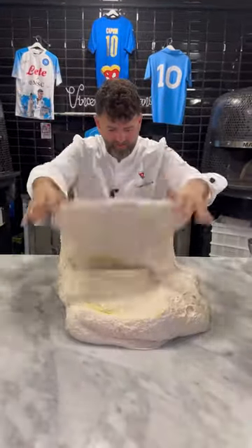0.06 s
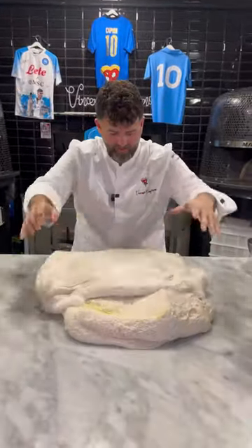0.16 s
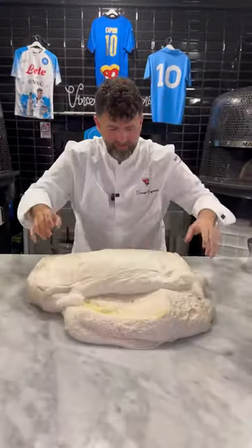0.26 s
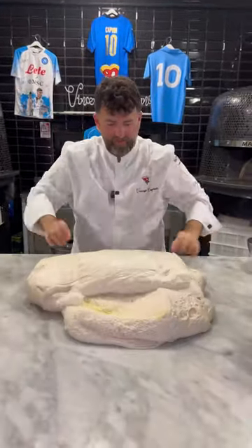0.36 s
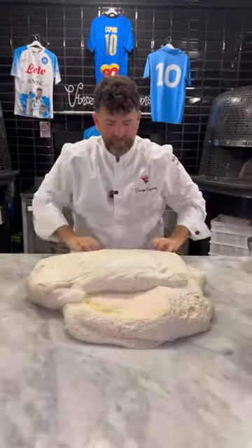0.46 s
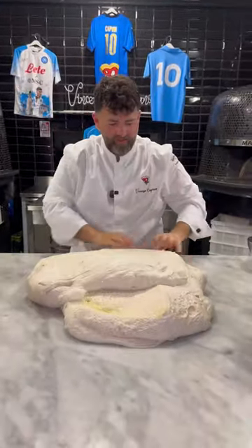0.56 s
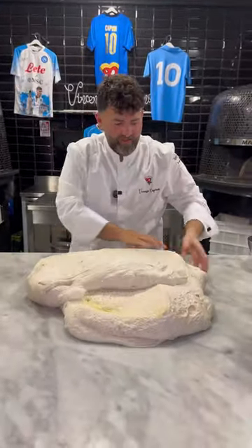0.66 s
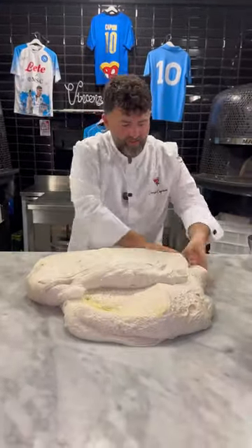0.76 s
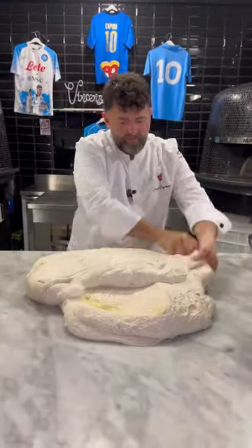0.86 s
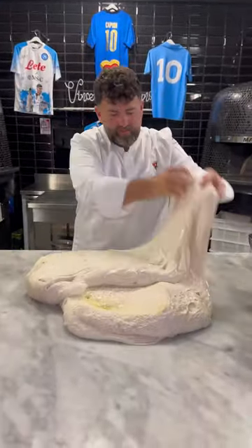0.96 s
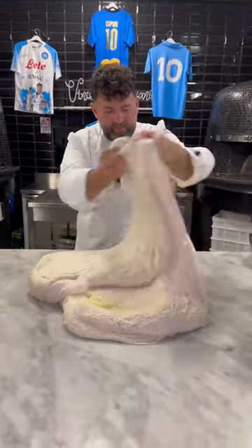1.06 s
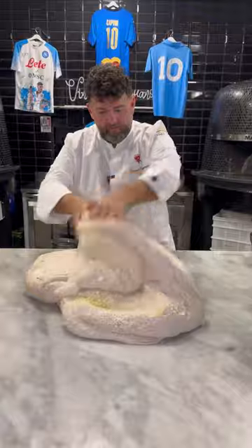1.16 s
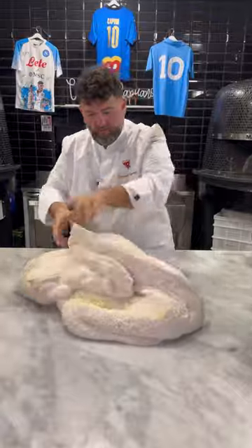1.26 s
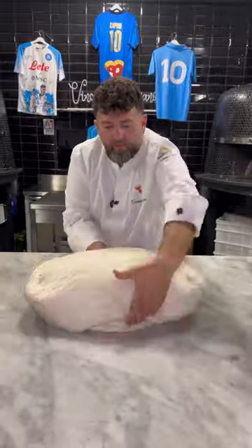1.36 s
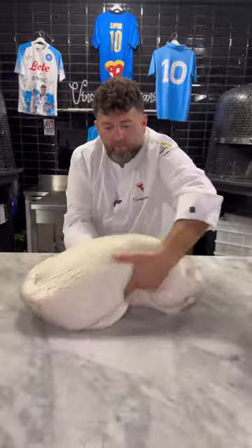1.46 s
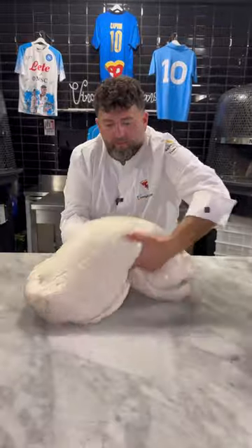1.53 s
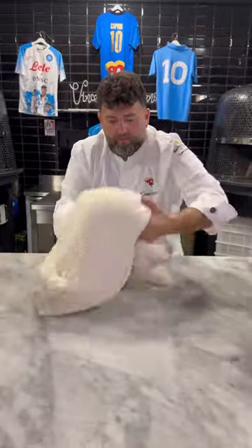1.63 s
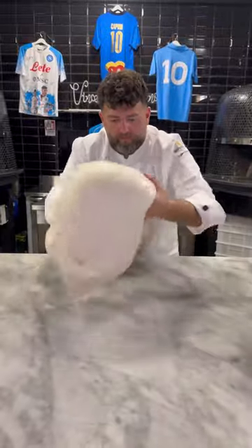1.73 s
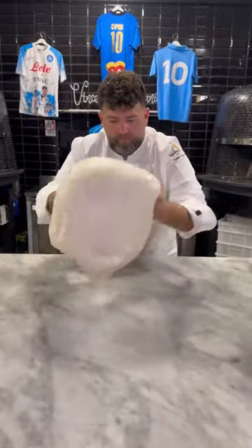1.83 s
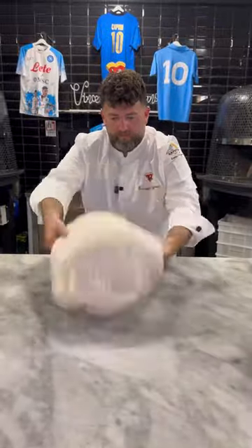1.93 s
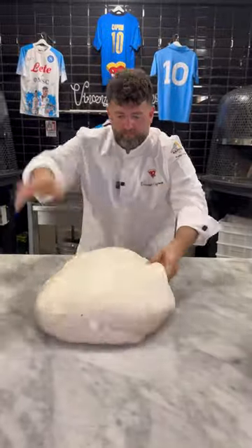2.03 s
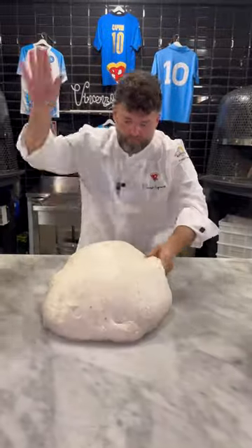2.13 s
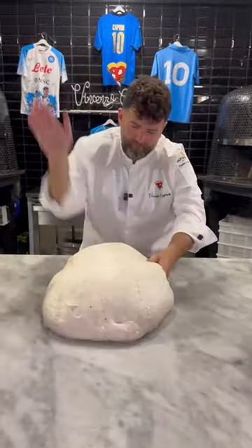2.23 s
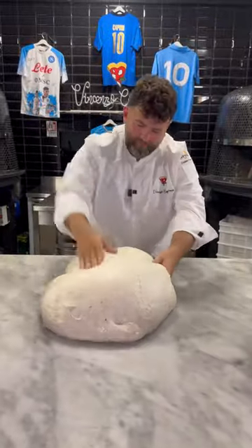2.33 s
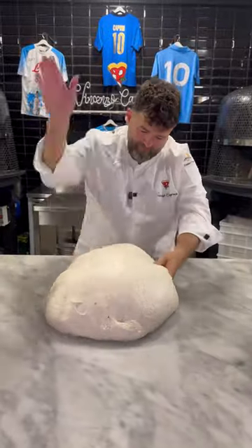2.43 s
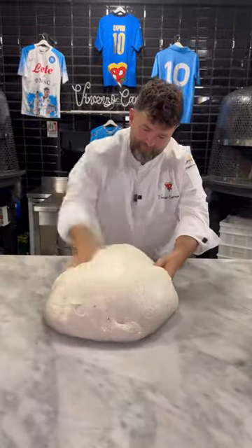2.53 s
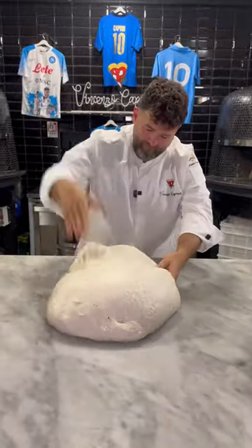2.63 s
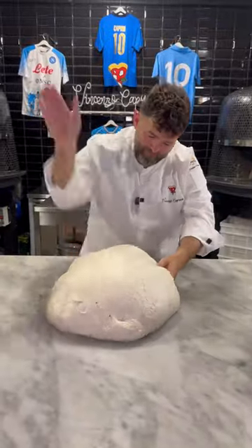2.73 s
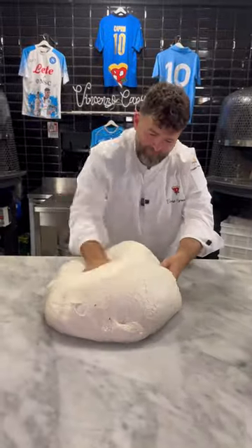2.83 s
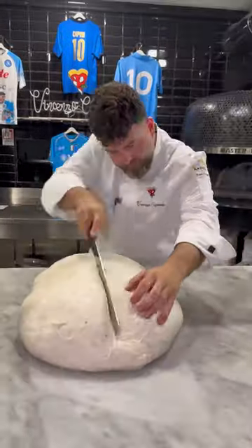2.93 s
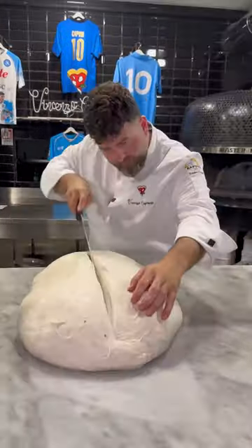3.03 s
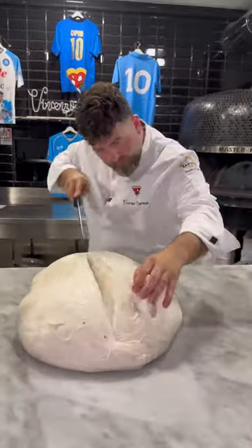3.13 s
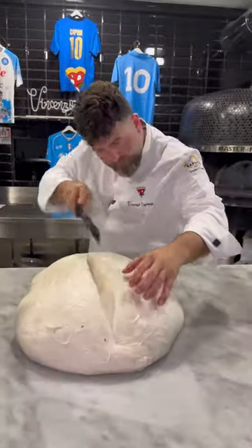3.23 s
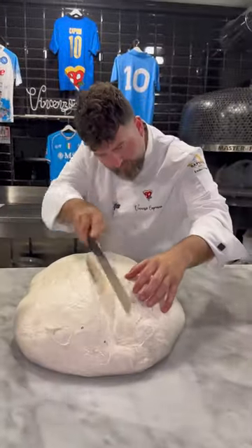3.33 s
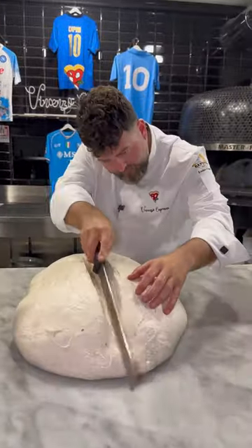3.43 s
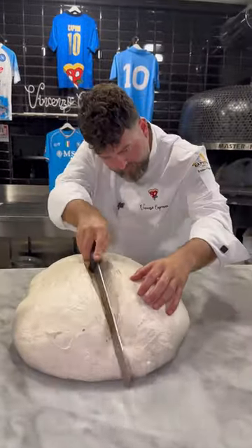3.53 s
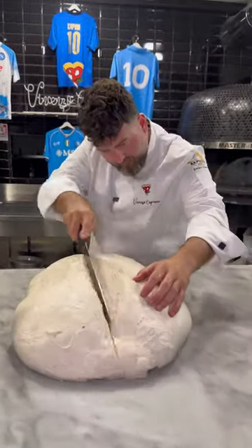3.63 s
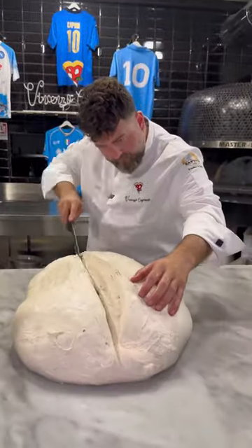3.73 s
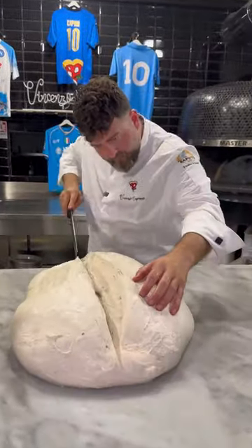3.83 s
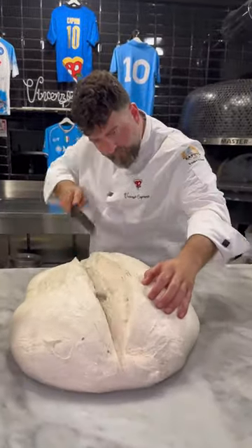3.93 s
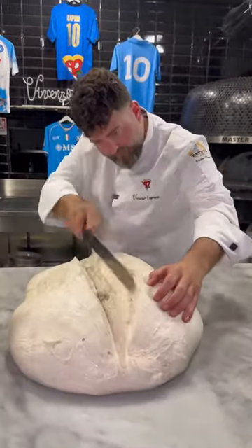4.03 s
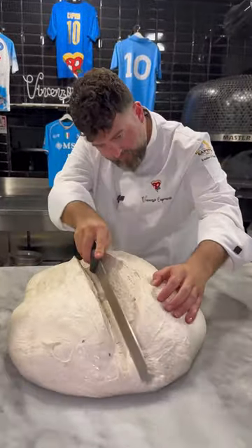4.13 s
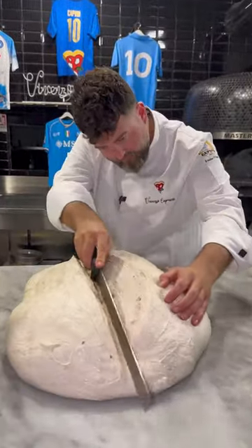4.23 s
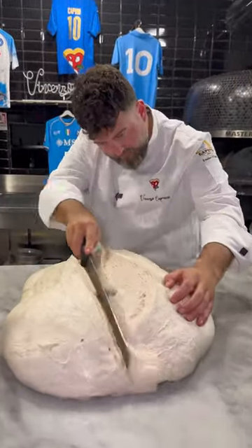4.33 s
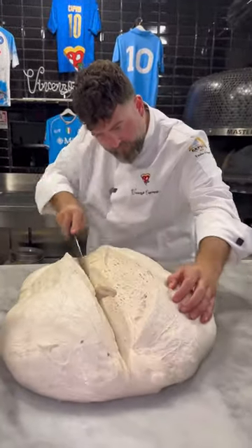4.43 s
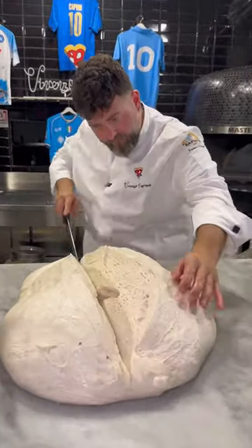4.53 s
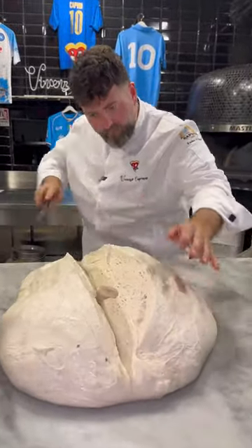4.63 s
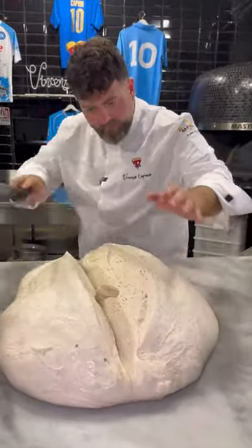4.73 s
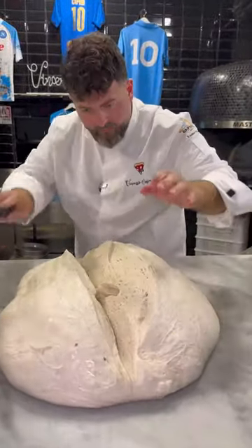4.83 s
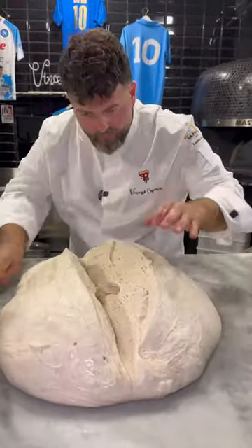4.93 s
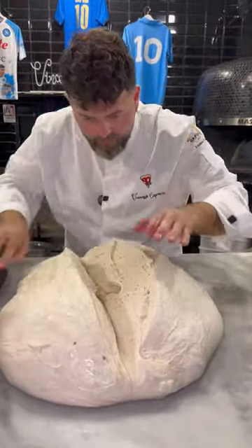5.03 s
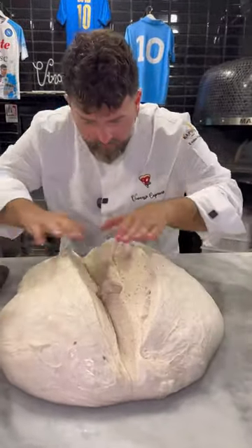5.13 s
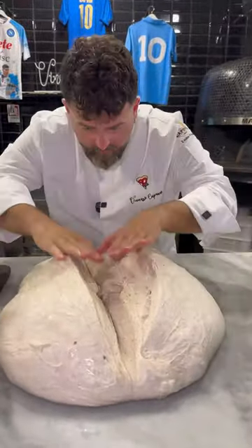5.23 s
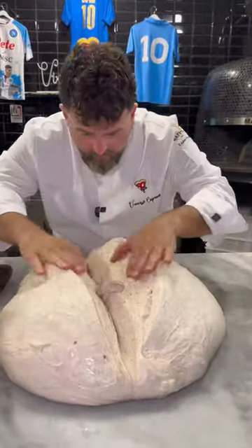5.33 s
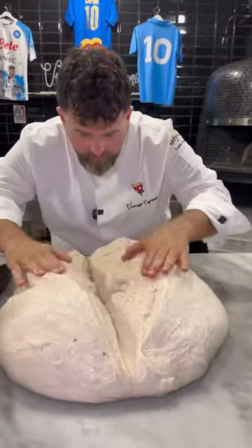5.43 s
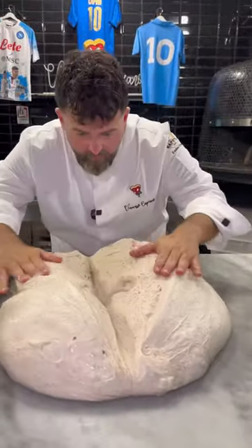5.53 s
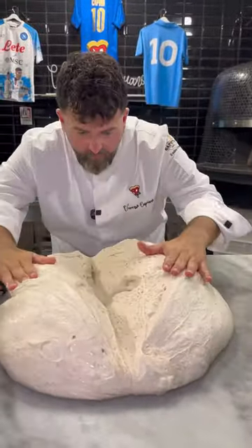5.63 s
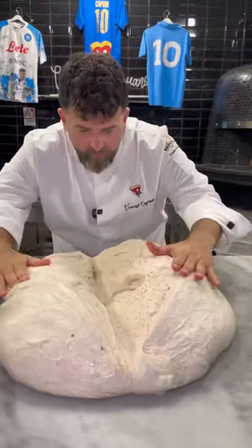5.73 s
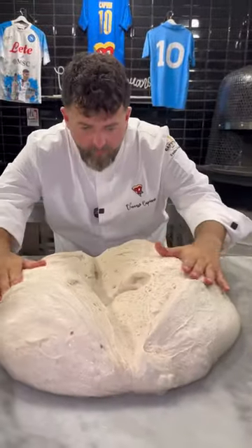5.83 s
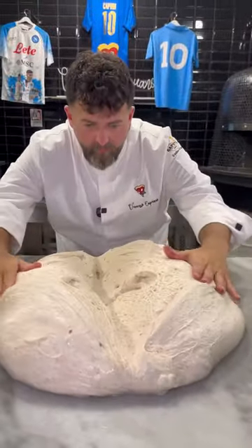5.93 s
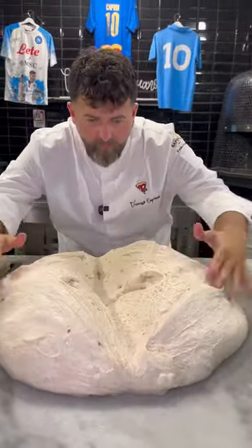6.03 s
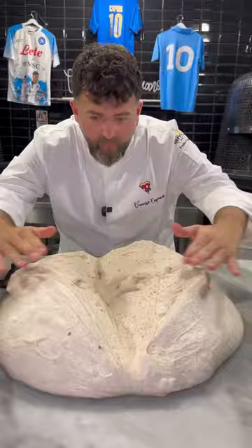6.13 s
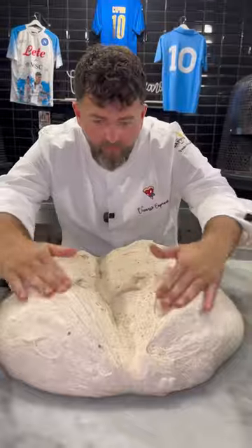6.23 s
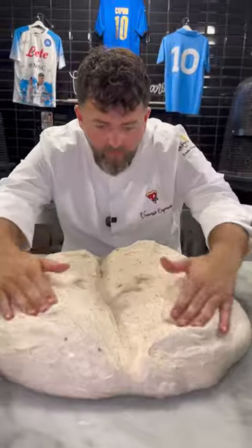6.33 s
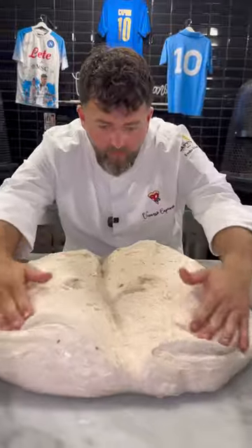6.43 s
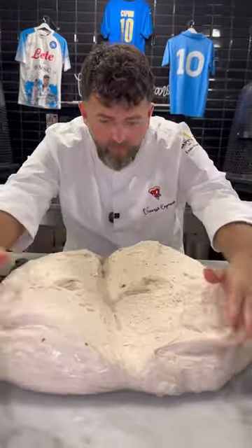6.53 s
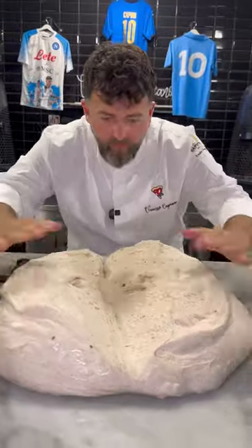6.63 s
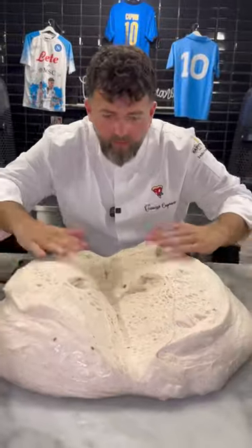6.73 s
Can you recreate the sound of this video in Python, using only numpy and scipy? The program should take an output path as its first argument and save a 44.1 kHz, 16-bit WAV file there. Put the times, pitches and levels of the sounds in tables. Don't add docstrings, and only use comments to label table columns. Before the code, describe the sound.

Heavy wet dough is folded, dropped and slapped three times very loudly on stone, then a thrown-down knife clatters and rings to rest.

```python
import sys
import numpy as np
from scipy import signal
from scipy.fft import rfft, irfft, next_fast_len
from scipy.io import wavfile
from scipy.ndimage import map_coordinates

SR = 44100
rng = np.random.default_rng(int(sys.argv[2]) if len(sys.argv) > 2 else 0)


def invert_db(x):
    u = np.asarray(x, float) / 20
    return 10 ** u


def generate_wav(sig):
    pcm = np.round(np.clip(np.atleast_2d(sig).T, -1, 1) * 32767).astype(np.int16)
    wavfile.write(sys.argv[1], SR, pcm)


N = 298597
TAIL = SR * 3 // 5

# frequency in Hz, level in dB per Hz.
COOLERS = [(15, -39), (25, -11), (70, -6.5), (138, 3.5), (197, -4), (259, 1.5), (445, -7.5), (524, -9.5),
           (726, -11.5), (878, -11.5), (979, -12), (1360, -21.5), (4500, -31.5), (10100, -38), (15800, -51),
           (16500, -58)]
# time in seconds, level in dB.
COOLERS_DB = [(0, -50.5), (1.9, -46.5), (3, -47), (4.2, -47), (5.6, -48), (6.77, -49)]
# frequency in Hz, width in Hz, level in dB.
HUMS = [(126, 14, -56.5), (262, 19, -55), (1460, 37, -70)]
# time in seconds, level in dB.
FAN = [(0, -58), (1.9, -55), (3, -60), (4.7, -57.5), (5.6, -63), (6.2, -55.5), (6.77, -62)]
FAN_HZ = 878

# frequency in Hz, level in dB per Hz.
COTTON = [(290, -30.5), (500, -1), (1060, -1.5), (1230, -2), (1620, -5.5), (4000, -20.5), (5200, -45.5),
          (8800, -120)]
# frequency in Hz, level in dB per Hz.
FIBRES = [(1470, -24.5), (2500, -5), (3480, -4), (11300, -14), (14900, -17), (16100, -14.5), (16500, -51)]
# frequency in Hz, level in dB per Hz.
WEIGHT = [(24, -30), (40, -5), (221, 4), (306, 1.5), (608, -4.5), (659, -6), (1000, -15.5), (1300, -33.5),
          (2200, -120)]
# peak time in seconds, level in dB, rise in seconds,
# fall in seconds, weight over the rub in dB.
FOLDING = [(.062, -50, 0.16, 0.21, 10.5), (.175, -44, 0.23, 0.11, 8.5), (.41, -54, 0.23, 0.21, 4),
           (.66, -52.5, 0.11, 0.36, 6), (.772, -48, 0.02, 0.21, 12.5), (.885, -45, 0.28, 0.12, 5),
           (.96, -57, .1, .1, 0), (1.015, -47.5, 0.073, .1, 3), (1.042, -47.5, 0.068, 0.02, 6),
           (1.17, -54, 0.24, 0.048, 6), (1.225, -44, 0.099, 0.14, 6.5), (1.27, -51.5, 0.084, .06, 9),
           (1.351, -44.5, 0.0056, 0.27, 8), (1.482, -42.5, 0.07, 0.031, 6.5), (1.43, -47, 0.099, .2, 0),
           (1.54, -49.5, 0.14, 0.36, -7), (1.945, -53.5, 0.16, 0.054, 8)]
CUTTING = [(2.96, -46, 0.022, 0.11, -1.5), (3.072, -50, 0.0095, 0.065, 17), (3.0, -51.5, 0.06, 0.057, 2.5),
           (3.14, -57.5, 0.095, 0.22, 2), (3.392, -40, 0.11, 0.05, -4), (3.45, -49, .1, 0.2, -10),
           (3.6, -50, 0.13, 0.29, 2), (3.87, -56, 0.64, 0.017, 12), (4.09, -47, 0.093, 0.2, 4.5),
           (4.14, -46, 0.21, 0.14, -3), (4.19, -55, 0.7, 0.0083, -7), (4.275, -54.5, 0.047, 1, 0),
           (4.31, -58, 0.081, 0.071, 6), (4.45, -54, 0.073, 0.27, 0.5), (4.66, -61, 0.054, 0.8, -4),
           (4.8, -58, 0.022, 0.16, 10.5), (4.95, -56.5, 0.042, 0.0098, 13)]
OPENING = [
    (5.51, -60.5, 0.046, 0.066, 15),
    (5.92, -60, 0.31, 0.077, 7.9),
    (6.04, -51, 0.071, 0.14, 7),
    (6.24, -47, 0.12, 0.25, 7.7),
    (6.32, -57, 0.15, 0.25, 6.5),
    (6.49, -49.5, 0.22, 0.13, 10.6),
    (6.54, -51, 0.35, 0.024, 11.3),
    (6.62, -45, 0.07, 0.11, 9.8),
    (6.68, -59, .05, 0.22, 14.5),
    (6.765, -57, 0.039, .1, 3.6),
]
BRIGHT_DB = (-3.5, -5, -4.5)
STROKE_DB = 20
DULLS_PER_DB, LIGHT_DB = 0.5, -47.5

# time in seconds, peak in dB, pitch in Hz, life in cycles.
THUDS = [(0.0609, -19, 209, 0.95), (0.1143, -23, 444, 1), (0.17, -21.5, 374, 0.46), (.754, -30, 244, 0.79),
         (0.7906, -31, 547, 0.69), (1.2054, -12, 480, 0.54), (1.231, -31, 339, .48),
         (1.346, -31, 206, 0.54), (1.3614, -26, 500, .6), (0.871, -29, 330, .5), (2.277, -29.5, 150, 0.96),
         (1.9979, -22.5, 300, .4), (1.5583, -26.5, 570, 0.55), (1.577, -29.5, 198, 0.99),
         (1.9774, -26, 214, .92), (2.008, -10.5, 134, 0.98), (2.0608, -17.5, 230, 0.44),
         (2.134, -28.5, 153, 0.65), (2.5523, -16, 420, 0.35), (2.551, -22, 900, .4),
         (3.0712, -24.5, 329, 0.46), (3.078, -25, 157, 0.55), (3.088, -28.5, 220, 0.49),
         (3.231, -26, 277, 0.4), (3.3358, -29, 199, 0.45), (3.777, -29.5, 183, 0.36), (3.784, -31, 450, .8),
         (3.819, -33, 277, 0.59), (4.055, -17.5, 248, 0.3), (4.063, -23, 260, 0.36),
         (4.554, -23.5, 129, 0.55), (4.575, -27.5, 267, 1), (4.684, -32.5, 163, 0.49),
         (5.7796, -38, 219, .99), (6.478, -21, 400, 0.4), (6.621, -40, 262, 0.7)]
THUD_TICK_DB, THUD_TICK_PER_OCTAVE_DB = -23, -2.5
# time in seconds, pull in dB, pitch in Hz, tick over the pull in dB.
TACKS = [(.146, -44, 920, -4), (0.8035, -24.5, 225, -10), (0.8497, -29, 400, -16), (1.0192, -32, 570, -1),
         (1.2733, -25, 220, -14), (1.359, -29, 360, -6), (1.476, -40, 700, -2), (1.647, -33, 430, 1),
         (1.6957, -41, 550, 6), (2.6, -34.5, 277, 7.5), (1.856, -50, 900, 10), (1.966, -28, 700, 8.5),
         (1.999, -14, 470, 6), (3, -36, 900, -7), (3.39, -33, 1100, -5), (3.979, -35, 280, -9),
         (4.13, -26.5, 930, 0), (6.0454, -33, 330, -11), (3.0735, -23, 650, -21),
         (1.2045, -16.5, 1120, -18), (6.4795, -23, 400, -22), (5, -45, 980, 7), (5.705, -43, 900, 1.5),
         (5.741, -48, 900, 7), (4.28, -41, 1000, 0), (4.822, -47.5, 840, 9), (.771, -25, 650, -13),
         (.1665, -23, 280, -20), (.884, -29.5, 250, -15), (0.067, -29, 830, -14), (.778, -29, 350, -15)]
TACK_CYCLES = 0.7
SNAP_S = 4.1956
# frequency in Hz, level in dB per Hz.
TICK = [(1000, -3.5), (4000, -2.5), (9000, -3.5), (12000, -8.5), (16000, -25.5)]

# start in seconds, length in seconds, level in dB.
RIPS = [(0.143, 0.006, -38.5), (0.113, .005, -45), (.666, .01, -54), (0.797, 0.0055, -44),
        (0.847, 0.0055, -43), (1.009, .012, -54), (1.199, 0.0072, -43.5), (1.357, 0.017, -44.5),
        (1.467, 0.014, -42), (1.975, 0.005, -43), (2.011, .006, -40), (1.974, .003, -48), (3.089, .02, -53),
        (3.281, 0.0043, -53), (3.346, .016, -46), (3.382, 0.018, -45), (3.496, 0.0045, -52),
        (4.13, 0.0069, -40.5), (4.228, 0.0027, -55), (4.442, 0.011, -63), (6.226, 0.0025, -41),
        (6.031, 0.017, -55), (6.003, 0.0039, -59), (2.252, 0.074, -56), (2.305, .003, -48),
        (2.793, 0.035, -46)]
# frequency in Hz, level in dB per Hz.
RASP = [(700, -38), (1500, 7), (3000, -1), (8000, -9), (15500, -21), (16500, -42)]

DROP_S = 1.9987
# frequency in Hz, level in dB per Hz.
SMACK = [(300, -10), (800, -2), (2000, -4), (3300, -1.5), (4200, -18), (5300, -4), (7000, -12),
         (10800, -32), (15000, -26.5), (16500, -43.5)]
# frequency in Hz, level in dB per Hz.
SETTLE = [(29, -36), (50, -9), (209, -8), (776, -18.5), (1490, -13), (1770, -21), (3250, -12.5),
          (3940, -17.5), (7500, -24), (9000, -33), (15800, -41), (16500, -59.5)]
# frequency in Hz, time to fall 60 dB in seconds.
TILES = [(60, 1), (160, 0.5), (420, 0.39), (1100, 0.46), (2910, 0.35), (7680, 0.35)]

SLAP_S = [2.3102, 2.5756, 2.8237]
CUT_S = 2.9385
# drum in dB, crack in dB, room in dB, drum pitch factor,
# hollow of the palm in Hz, squelch in Hz.
SLAPS = [
    (5.5, 8.5, -10.5, 1.01, 5800, 2100),
    (3, 9, -11.5, .99, 2500, 2100),
    (6.5, 9, -7.5, 1.02, 4010, 1600),
]
# cloth in dB, weight in dB, rise in seconds.
SWING = [
    (-36, -32, .012),
    (-59, -40, .02),
    (-47.5, -27.5, .015),
]
# frequency in Hz, level in dB, time to fall 60 dB in seconds.
DRUM = [(78.8, -10, 0.13), (141.4, 4, 0.061), (154.2, -13.5, 0.33), (177.2, -10.5, 0.1), (262, -13, 0.17),
        (414.2, -11, 0.13), (448.8, -14.5, 0.13), (640, -20.5, 0.089), (1079, -19.5, 0.13)]
# frequency in Hz, level in dB,
# time to fall 60 dB in seconds.
OWN = [
    [(430, -20, .3), (910, -14, .15), (697, -16, .12), (345, -20, .17)],
    [(221, -24, 1), (1380, -17.5, 0.27), (1545, -15, .15), (915, -20.5, 0.2)],
    [(665, -13, 0.12), (1214, -14, .19), (1734, -12.5, .14), (258, -10, .2)],
]
# frequency in Hz, level in dB.
CRACK = [(300, 2), (1500, 4.5), (3000, -9), (6000, -12), (10000, -5), (16000, -27)]
# frequency in Hz, level in dB per Hz.
FLAP = [(250, -30), (600, -8), (1000, 0.5), (1800, -3), (3500, -14.5), (9000, -30)]
FLAP_DB = (-7, -8.5, -5.5)
FLAP_T60_S = (.07, 0.053, 0.079)
# frequency in Hz, level in dB per Hz.
WASH = [(29, -46), (50, -15.5), (156, 1.5), (316, -4.5), (455, -4.5), (539, -13.5), (795, -14.5),
        (897, -13), (1950, -18), (2550, -18.5), (9910, -26.5), (15800, -40), (16500, -60)]

# time in seconds, level in dB, pitch in Hz.
SPITS = [
    (2.3158, -10, 10000),
    (2.347, -19, 9000),
    (2.5835, -12.5, 5000),
    (2.551, -33, 3200),
    (2.558, -35.5, 9000),
]
# start in seconds, level in dB, first pitch in Hz,
# rise in Hz per second, time to fall 60 dB in seconds.
POCKETS = [
    (2.32, -21.5, 1340, 1700, .2),
    (2.593, -12, 1500, 39000, 0.055),
    (2.838, -16, 1580, 5000, 0.22),
    (2.83, -26, 1100, 7100, .12),
]

# time in seconds, peak in dB, handle knock in dB,
# scrape length in seconds, tip brightness in dB.
FALL = [
    (4.96, -6, -5.5, 0.0044, 7),
    (4.9656, 0.5, -4, 0.0043, 0),
    (4.9676, -0.5, -3, .002, 0.5),
    (4.969, 2, -1, 0.0045, 4.5),
    (4.98, -14, 5.5, 0.0064, 2.5),
]
# heel time in seconds, heel in dB, tip delay in seconds, tip in dB.
ROCKS = [
    (5.0435, -10.5, 0.0094, -7),
    (5.1281, -12, 0.0062, -18),
    (5.198, -10, 0.0064, -12),
    (5.211, -19, 0.032, -26),
    (5.2854, -19, .0105, -27),
    (5.303, -23, 0.019, -28),
    (5.351, -32.5, 0.024, -31),
]
ROCK_S, HEEL_KNOCK_DB, TIP_KNOCK_DB = 0.0027, -26, -18
SHARP_DB, DULLS_DB_PER_S = 7.5, 29.5
# time in seconds, level in dB.
TAPS = [
    (5.082, -22),
    (5.099, -33),
    (5.156, -28),
    (5.177, -25),
    (5.056, -24),
    (5.012, -22),
]
TAP_BLADE_DB = -21
# frequency in Hz, width in Hz, level in dB.
BLADE = [(6900, 350, -0.5), (7650, 160, 2.5), (8290, 430, -2), (9190, 300, 2), (9880, 480, -2.5),
         (10800, 250, -4.5), (11400, 320, -4.5), (12300, 500, -8), (13470, 500, -4.5), (14630, 630, -3),
         (15800, 310, -5.5)]
# frequency in Hz, width in Hz, level in dB.
HANDLE = [(1080, 160, -4), (1739, 90, -6), (1870, 79, 0), (2410, 130, 0), (3135, 120, -3.5),
          (3355, 150, -2.5), (3864, 400, 2.5), (4620, 270, -2.5), (5950, 360, -4.5)]
# frequency in Hz, level in dB, time to fall 60 dB in seconds.
GRIP = [(790, -6, .09), (1130, -4, .09), (1460, -9, .08), (1900, 0, .12), (2050, -8, .08)]
GRIP_DB = -6
# frequency in Hz, level in dB, time to fall 60 dB in seconds.
CHIME = [(1590, 0, 0.25), (1880, -6, 0.3), (2620, -5, .4), (2800, -2, 0.26), (3300, -1.5, 0.31),
         (3600, -12, 0.75), (5040, -15.5, 0.78), (5800, -9.5, 0.35), (3680, -9, .3), (4910, -5.5, .2),
         (6600, -14, .5), (7700, -3.5, .21), (8900, -6, 0.36)]
# frequency in Hz, level in dB,
# time to fall 60 dB in seconds.
GLINT = [(9491, -8, .25), (10790, -9, .22), (12330, -10.5, .2), (13470, -3, .13), (14590, -10, .2)]
GLINT_DB = -29
# frequency in Hz, level in dB, time to fall 60 dB in seconds.
SHELF = [(275.2, -11.5, 0.3), (268, -30, 0.5), (309, -26, 0.12), (393, -23, 1.22), (450, -20, 0.11),
         (748, -28, 0.22)]
RESTS_S, RESTS_DB = .038, -14.5
# time in seconds, level in dB, pitch in Hz.
PANEL_KNOCKS = [
    (5.045, -25, 285),
    (5.082, -29, 296.5),
    (5.15, -25, 271),
    (5.19, -35, 275.7),
    (5.295, -38, 275.5),
]
PANEL_T60_S, PANEL_SWELL_S = 0.3, 0.009
# frequency in Hz, level in dB per Hz.
CLANG = [(88, -51.5), (150, -25), (287, -4), (583, -12), (1690, -11.5), (2010, -15), (3850, -16),
         (8970, -23), (15800, -28.5), (16500, -48.5)]

# frequency in Hz, level in dB.
RECORDER_BAND = [(20, -4), (50, -0.44), (15800, -0.5), (16100, -13.0), (16800, -26), (16950, -70)]


def unit(x):
    return x / np.sqrt(np.mean(x ** 2) + 1e-20)


def along(points, hz):
    f, v = np.transpose(points)
    return np.interp(np.log(hz + 1), np.log(f + 1), v)


def filtered(x, response):
    m = next_fast_len(len(x) + 8192)
    spectrum = rfft(x, m) * response(np.fft.rfftfreq(m, 1 / SR))
    return irfft(spectrum, m)[:len(x)]


def noise(spectrum, count=N):
    return unit(filtered(rng.standard_normal(count), lambda hz: invert_db(along(spectrum, hz))))


def wobble(rate):
    knots = rng.standard_normal(int(N * rate / SR) + 4)
    return map_coordinates(knots, [np.arange(N) * rate / SR])


def body(modes):
    def response(f):
        total = 0
        for k, (centre, width, db) in enumerate(modes):
            damping = 1j * f * width
            total = total + (-1) ** k * invert_db(db) * damping / (centre * centre - f * f + damping)
        return total
    return response


def ring(modes, t, pitch, attack):
    run = pitch * (t + 0.0022 * (1 - np.exp(-t / 0.0036)))
    tones = sum(invert_db(db - 60 * t / t60) * np.sin(2 * np.pi * hz * run) for hz, db, t60 in modes)
    return tones * (1 - np.exp(-t / attack))


def add(track, s, sound):
    part = track[round(s * SR):][:len(sound)]
    part += sound[:len(part)]


def echo(spectrum, stretch, build):
    hz, t, z = signal.stft(noise(spectrum, count=TAIL), SR, nperseg=256)
    fade = invert_db(-60 * t / (stretch * along(TILES, hz)[:, None]))
    tail = signal.istft(z * fade, SR, nperseg=256)[1][:TAIL]
    return tail * (1 - np.exp(-np.arange(TAIL) / SR / build))


def kitchen():
    t = np.arange(N) / SR
    drone = noise(COOLERS) * invert_db(np.interp(t, *np.transpose(COOLERS_DB)) + 1.5 * wobble(4.74))
    hums = np.zeros(N)
    for hz, width, db in HUMS:
        hums += invert_db(db) * unit(filtered(rng.standard_normal(N), body([(hz, width, 0)])))
    fan_level = invert_db(np.interp(t, *np.transpose(FAN)) + 2.5 + 3.5 * wobble(7.7))
    fan = fan_level * np.sin(2 * np.pi * np.cumsum(FAN_HZ + 4 * wobble(18)) / SR)
    return drone + hums + fan


def jacket():
    t, power = np.arange(N) / SR, np.zeros((3, N))
    slips = 1.5 * wobble(60) + 1.5 * np.minimum(wobble(700) ** 2, 4)
    layers = [unit(invert_db(depth * slips) * noise(s)) for s, depth in ((COTTON, .9), (FIBRES, .6), (WEIGHT, .6))]
    for strokes, bright_db in zip((FOLDING, CUTTING, OPENING), BRIGHT_DB):
        for s, db, rise, fall, weight_db in strokes:
            near = slice(max(round((s - 1) * SR), 0), round((s + 1) * SR))
            before = (s - t[near]) / max(rise, 1e-3)
            after = (t[near] - s) / max(fall, 1e-3)
            away = np.where(t[near] < s, before, after)
            hiss_db = bright_db - DULLS_PER_DB * max(db - LIGHT_DB, 0)
            layer_gain = invert_db([[3.5], [hiss_db], [weight_db - 1.5]])
            power[:, near] += (invert_db(db - STROKE_DB * away) * layer_gain) ** 2
    return (np.sqrt(power) * layers).sum(axis=0)


def knocks():
    out, t = np.zeros(N), np.arange(-SR // 100, SR // 10) / SR
    contacts = []
    for s, db, hz, life in THUDS:
        tick_db = THUD_TICK_DB + THUD_TICK_PER_OCTAVE_DB * np.log2(hz / 300)
        contacts.append((s, db, hz, life, tick_db, 1))
    for s, db, hz, tick_db in TACKS + [(SNAP_S, -25, 1400, -12)]:
        contacts.append((s, db, hz, TACK_CYCLES, tick_db, -1))
    for s, db, hz, cycles, tick_db, way in contacts:
        turns = hz * np.where(t < 0, t, .85 * t)
        fade = np.where(t < 0, np.exp(-(turns / 0.45) ** 2), np.exp(-turns / max(cycles, .2)))
        push = np.cos(2 * np.pi * turns) * fade
        tick = noise(TICK, count=len(t)) * invert_db(tick_db - 7.0 - 60 * (t + 0.0013) / 0.0078) * (t > -.001)
        add(out, s - 1 / 100, invert_db(db) * (way * push + tick))
    return out


def rips():
    out, t = np.zeros(N), np.arange(SR // 10) / SR
    for s, length, db in RIPS:
        shape = np.clip(t / 0.0022, 0, 1) * np.exp(-np.maximum(t - length, 0) / 0.0017)
        add(out, s, invert_db(db) * shape * noise(RASP, count=len(t)))
    return out


def drop():
    out, t = np.zeros(N), np.arange(TAIL) / SR
    drag = t[:SR // 20] / 0.048
    scuff = invert_db(-33.0) * noise(WASH, count=SR // 20) + invert_db(-63.0) * noise(FIBRES, count=SR // 20)
    add(out, DROP_S - .034, scuff * np.clip(3 * drag, 0, 1) * (drag < 1.1))
    smack = noise(SMACK, count=TAIL) * invert_db(-4.0 - 60 * t / 0.017) * (1 - np.exp(-t / 0.00048))
    add(out, DROP_S, smack)
    second_flap = noise(SMACK, count=TAIL) * invert_db(-25.0 - 60 * t / 0.038) * (1 - np.exp(-t / .002))
    add(out, DROP_S + 0.0084, second_flap)
    add(out, DROP_S, invert_db(-30) * echo(SETTLE, stretch=1.32, build=0.0081))
    return out


def slaps():
    out, t = np.zeros(N), np.arange(TAIL) / SR
    lead = SR // 5
    for s, slap, swing, own, flap_db, flap_s in zip(SLAP_S, SLAPS, SWING, OWN, FLAP_DB, FLAP_T60_S):
        drum_db, crack_db, room_db, pitch, cup_hz, wash_hz = slap
        cloth_db, weight_db, rise = swing
        cloth = filtered(noise(COTTON, count=lead), lambda hz: 1 + (hz / 3000) ** 3.6)
        sleeve = invert_db(cloth_db) * cloth + invert_db(weight_db) * noise(WEIGHT, count=lead)
        add(out, s - 1 / 5, sleeve * np.exp((t[:lead] - 1 / 5) / rise))

        air = noise(CRACK, count=TAIL) * invert_db(crack_db - 60 * t / 0.016) * (1 - np.exp(-(t / 0.0005) ** 2))
        add(out, s, air + filtered(air, body([(cup_hz, cup_hz / 6, 8)])))

        wet = invert_db(0.87 * map_coordinates(rng.standard_normal(200), [t * 150]))
        wash = invert_db(room_db) * echo(WASH, stretch=1.223, build=0.0055) * wet
        squelch = body([(wash_hz, 900, -3)])
        add(out, s, filtered(wash, lambda hz: hz / (hz + 120) + squelch(hz)))

        add(out, s + 0.00099, invert_db(drum_db) * ring(DRUM, t, pitch, attack=0.0029))
        flap = noise(FLAP, count=TAIL) * invert_db(flap_db - 60 * t / flap_s) * (1 - np.exp(-t / .0025))
        add(out, s + 0.0012, ring(own, t, 0.98, attack=0.003) * wet + flap)
    return out * np.clip((CUT_S - np.arange(N) / SR) / 0.00099, 0, 1)


def trapped_air():
    out, t = np.zeros(N), np.arange(SR // 4) / SR
    for s, db, hz in SPITS:
        puff = rng.standard_normal(len(t)) * invert_db(db + 7.0 - 60 * t / .008)
        add(out, s, filtered(puff, body([(hz, hz / 3, 0)])))
    for s, db, hz, rise, t60 in POCKETS:
        pitch_shake = map_coordinates(rng.standard_normal(100), [t * 130])
        level_shake = map_coordinates(rng.standard_normal(100), [t * 130])
        pitch = hz + rise * t + 45 * pitch_shake
        level = invert_db(db - 60 * t / t60 + 3.2 * level_shake) * (1 - np.exp(-t / 0.0022))
        add(out, s, level * np.sin(2 * np.pi * np.cumsum(pitch) / SR))
    return out * np.clip((CUT_S - np.arange(N) / SR) / 0.0014, 0, 1)


def touches():
    def sharp(s):
        return SHARP_DB - DULLS_DB_PER_S * (s - ROCKS[0][0])

    heels = [(s, db, HEEL_KNOCK_DB, ROCK_S, sharp(s)) for s, db, _, _ in ROCKS]
    tips = [(s + lag, db, TIP_KNOCK_DB, ROCK_S, sharp(s + lag)) for s, _, lag, db in ROCKS]
    taps = [(s, db + TAP_BLADE_DB, -TAP_BLADE_DB - 6, ROCK_S, 0) for s, db in TAPS]
    return FALL + heels + tips + taps


def knife():
    low, high, handle = np.zeros(SR), np.zeros(SR), np.zeros(SR)
    out, t = np.zeros(N), np.arange(TAIL) / SR
    start = FALL[0][0]
    for s, db, knock_db, length, tip_db in touches():
        scrape = rng.standard_normal(SR // 10) * np.exp(-t[:SR // 10] / max(length, 1e-4)) * invert_db(db + 1.5)
        add(low, s - start, scrape)
        add(high, s - start, scrape * invert_db(tip_db - 5.5))
        add(handle, s - start, scrape * invert_db(knock_db + 4.5))
    steel = filtered(low, body(BLADE[:6])) + filtered(high, body(BLADE[6:])) + filtered(handle, body(HANDLE))
    tail = noise(TICK, count=TAIL) * invert_db(-49 - 60 * t / 0.38)
    add(out, start, steel + signal.fftconvolve(steel, tail)[:SR])

    for s, db in TAPS:
        grip = [(hz, level + 3 * rng.standard_normal(), t60) for hz, level, t60 in GRIP]
        add(out, s, invert_db(db + GRIP_DB) * ring(grip, t, 1, attack=.001))
    add(out, 4.97, invert_db(GLINT_DB) * ring(GLINT, t, 1, attack=.0006))
    add(out, 4.97, invert_db(-26.0) * ring(CHIME, t, 1.0, attack=.001))

    damping_db = RESTS_DB * np.clip((t - RESTS_S) / 0.0087, 0, 1)
    add(out, 4.9725, invert_db(0.5 + damping_db) * ring(SHELF, t, 0.97, attack=0.0023))
    for s, db, hz in PANEL_KNOCKS:
        level = invert_db(db - 60 * t / PANEL_T60_S) * (1 - np.exp(-t / PANEL_SWELL_S))
        add(out, s, level * np.sin(2 * np.pi * hz * t))
    add(out, 4.968, invert_db(-20) * echo(CLANG, stretch=1.66, build=0.0034))
    add(out, 4.968, invert_db(-16.5) * ring([(85, 0.00059, 0.065)], t, 1, attack=0.002))
    return out


def scene():
    background = kitchen() + jacket()
    dough = knocks() + rips() + drop() + slaps() + trapped_air()
    return (background + dough + knife())[None]


def low_pass(x):
    return signal.sosfilt(signal.butter(12, 16880, fs=SR, output="sos"), x)


def record(dry):
    clipped = dry[0] / (1 + np.abs(dry[0] / 1.01) ** 20) ** (1 / 20)
    band = filtered(clipped, lambda hz: invert_db(along(RECORDER_BAND, hz)))
    return low_pass(band[None])


dry = scene()
out = record(dry)
generate_wav(out)
```